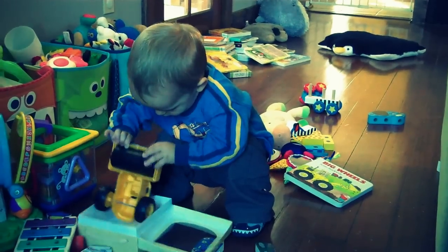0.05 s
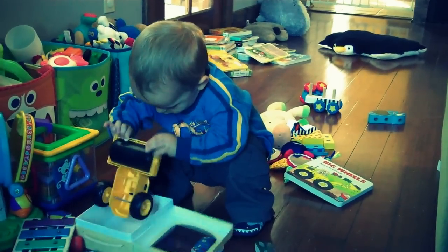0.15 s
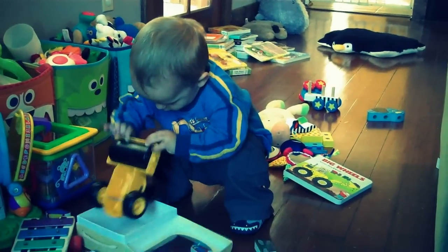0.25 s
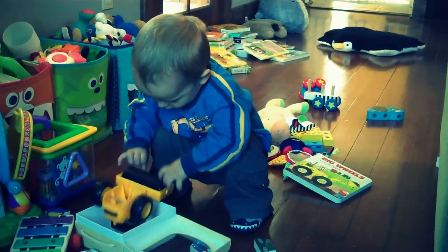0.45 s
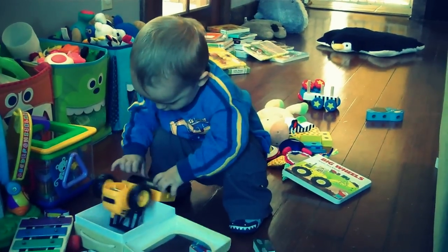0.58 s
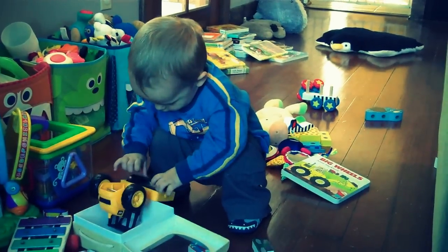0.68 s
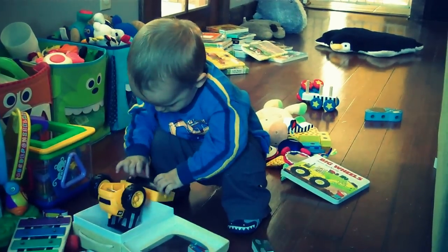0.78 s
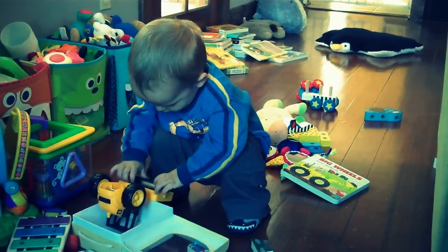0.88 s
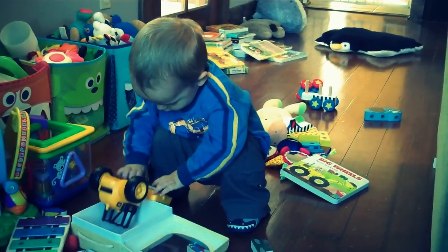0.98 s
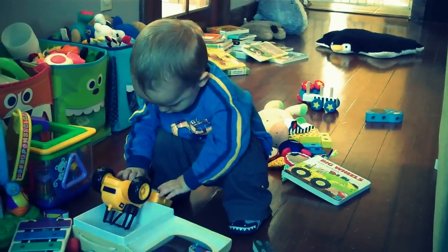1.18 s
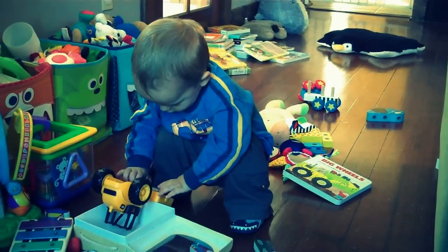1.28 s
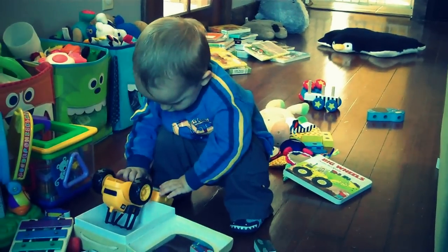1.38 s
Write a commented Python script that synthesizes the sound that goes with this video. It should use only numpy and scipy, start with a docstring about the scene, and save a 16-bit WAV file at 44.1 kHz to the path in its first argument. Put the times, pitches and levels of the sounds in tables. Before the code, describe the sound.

Plastic toy clattering and rattling on a hollow plastic base in a small room.

```python
"""First comes a soft scrape with two light ticks, then a clatter: a plastic toy digger is dragged,
knocked and dropped onto a hollow plastic toy on a wooden floor, then nudged once more.
Each knock is a short crack that sets the digger and the hollow base under it ringing.
Between knocks the wheels scrape and loose parts rattle. A small living room echoes over a faint hiss."""
import sys
import numpy as np
from scipy import signal
from scipy.fft import rfft, irfft
from scipy.io import wavfile

SR = 44100
rng = np.random.default_rng(int(sys.argv[2]) if len(sys.argv) > 2 else 0)


def transcribe(u):
    """Save the signal u as a 16-bit wav file named by the first command-line argument.

    u: samples, shape (n,) or (channels, n), limited to [-1, 1]; the rate is SR.
    q: integer samples, one column per channel.
    """
    v = np.clip(np.atleast_2d(u).T, -1, 1)
    q = np.round(v * 32767).astype(np.int16)
    wavfile.write(sys.argv[1], SR, q)


N = 63945
T = np.arange(N) / SR

# Knocks: t/s, five crack levels/dB (at CRACK_HZ), crack fade/s, digger ring/dB, base ring/dB,
# struck part's f/Hz, its boost/dB. A "fade" is the time a sound takes to drop by 60 dB.
KNOCKS = [ (0.072, -77, -67, -69, -70, -55, 0.055, -81, -74, 6000, 6.3),
          (0.084, -75, -59, -53, -60, -48, .03, -84, -83, 5660, 5.5),
          (0.2099, -71.5, -46.5, -41, -35.5, -36, 0.06, -54, -37, 1250, 3.7),
          (0.2308, -59, -59, -43.5, -34.5, -25, 0.012, -51, -53, 5720, 7),
          (0.278, -62, -40.5, -44.5, -45, -31, 0.052, -58, -62, 6000, 5.3),
          (0.2958, -47, -34, -25.5, -31, -24, 0.058, -35.5, -43.5, 4760, 2.7),
          (0.3089, -46, -55, -32, -30.5, -23.5, 0.06, -60, -53, 1944, 11),
          (0.3729, -59, -66, -27, -35, -55, 0.057, -38.5, -47, 1460, 12),
          (0.4192, -60, -63, -39, -36, -26.5, 0.006, -55, -41, 6050, 1.9),
          (0.4524, -70, -35, -26.5, -35, -29.5, 0.044, -47, -22, 1086, 14),
          (.462, -68, -38, -30.5, -34.5, -57, 0.081, -48, -34, 1980, 13),
          (.481, -48, -44.5, -29.5, -61, -46, 0.1, -60, -41, 1010, 3),
          (0.53, -70, -63, -28.5, -34, -20, 0.0092, -48, -55, 3450, 7.8),
          (.539, -71, -81, -31, -37, -33, 0.011, -59, -57, 1930, 12.5),
          (0.584, -52, -58, -21, -26.5, -7, 0.011, -21.5, -32, 7700, 1.6),
          (.592, -51, -31.5, -29.5, -22, -12.5, 0.038, -25, -25.5, 1220, 6.5),
          (.599, -51, -35, -30, -24.5, -21.5, 0.039, -33.5, -46, 600, 7),
          (0.618, -42, -48, -34, -42, -57, .05, -43, -41, 313, 5),
          (0.6594, -80, -36, -31, -30.5, -20.5, 0.027, -33, -59, 2170, 11.6),
          (.680, -66, -38, -38, -32.5, -26.5, 0.073, -53, -52, 2150, 1.4),
          (.703, -63, -59, -40, -30, -31, 0.068, -46, -57, 3650, 4.9),
          (0.7555, -81, -44.5, -40.5, -34.5, -24, 0.023, -35.5, -36.5, 5840, 6.6),
          (.777, -81, -59, -43, -34, -38, 0.022, -50, -60, 2160, 8.4),
          (.8175, -66, -37, -35, -27, -24.5, 0.048, -52, -31, 695, 16.3),
          (.832, -70, -55, -35.5, -39.5, -22.5, 0.036, -47, -37.5, 710, 17.5),
          (0.8491, -75, -44, -58, -35.5, -34, 0.013, -60, -46.5, 6070, 5.1),
          (0.8793, -62, -51, -56, -34, -28.5, .018, -42.5, -46, 4700, 3.4),
          (1.043, -70, -61, -82, -61, -53, .03, -95, -86, 5400, 4),
          (1.1216, -66, -53.5, -45, -47, -44.5, 0.12, -52, -54, 1500, 11),
          (1.152, -70, -62, -57, -48.5, -49, 0.12, -68, -52, 950, 13),
          (1.173, -66, -62, -63, -60, -41, 0.058, -65, -70, 4150, 3.4),
          (1.182, -72, -70, -66, -45.5, -40, .08, -70.5, -71, 3970, 7.7),
          (1.401, -64, -77, -92, -73, -49.5, 0.11, -84, -82, 6300, 3), ]
# Where the five crack levels apply, bass to treble: f/Hz
CRACK_HZ = [70, 280, 1100, 3000, 6500]
# Tones the digger's shell rings with: f/Hz, level/dB, fade/s
DIGGER_TONES = [(234.4, -4, 0.093), (305.4, -13.5, 0.47), (630, -11, 0.16), (1090.5, 1.5, .07),
                (1190, -5, 0.16), (1300, -11.5, 0.3), (1708, -7, .09), (2150, -4.5, 0.066),
                (4100, -3.5, 0.15), (4140, -20, 0.065), (5880, -4, 0.055), (5470, -14, 0.089),
                (7800, -15, .06), (7770, -20, 0.059)]
# Tones the hollow base rings with: f/Hz, level/dB, fade/s
BASE_TONES = [(178, -13.5, 0.1), (593, -8.5, 0.22), (733, -13, .09), (1013, 0.5, 0.072),
              (1344, -1.5, 0.053), (1521, -1.5, 0.064), (1830, -9, 0.024), (2160, -4, 0.032)]
# How hard the toy scrapes along: t/s, level/dB
SCRAPE_LEVEL = [(0, -52.5), (.07, -52), (.1, -39.5), (.13, -48.5), (.165, -29), (.205, -24.5), (.26, -40),
                (.35, -32), (.43, -32), (.51, -42.5), (.57, -23.5), (.65, -44), (.73, -25.5), (.8, -26.5),
                (.9, -29.5), (.96, -43), (1.03, -57), (1.2, -46), (1.3, -51.5), (1.45, -54.5)]
# The scrape's mix of bass and treble: f/Hz, level/dB
SCRAPE_COLOUR = [(50, -32), (130, -16), (250, -8), (450, -10.5), (700, 5), (1200, 5), (2500, -0.5),
                 (4000, -1), (6000, 0), (8000, 5.5)]
# Hums of the base under a dragging wheel: t/s, length/s, f/Hz, level/dB
WHEEL_HUMS = [(0, 0.084, 706, -59), (0.139, 0.074, 726, -43), (0.148, .075, 601, -47)]
# How long the room echoes: f/Hz, fade/s
ECHO_FADE = [(100, .4), (500, 0.4), (2000, 0.55), (8000, 0.32)]
# The echo against the direct sound: f/Hz, level/dB
ECHO_LEVEL = [(70, -7.5), (250, -6), (1000, -6), (3000, -4.5), (7000, -7)]
# How alike left and right are in echo and hiss: f/Hz, likeness (1 same, -1 opposite)
LIKENESS = [(60, 0.18), (200, 0.88), (700, 0.75), (1500, 0.34), (3000, 0.079), (6000, -0.39)]
# The hiss's mix of bass and treble: f/Hz, level/dB
HISS_COLOUR = [(30, 2), (70, 3.5), (130, 3), (250, 5.5), (450, 5.5), (750, 3), (1500, -2.5), (2500, -5.5),
               (6000, -2), (8000, -3.5)]
# How far the left microphone opening runs ahead of the right: f/Hz, phase/rad
LEFT_LEAD = [(4500, 0), (5700, 0.33), (6900, 1.9), (8000, 0)]
# How much louder the left opening is than the right: f/Hz, level/dB
LEFT_LOUDER = [(200, 0), (4600, -0.3), (5900, -8), (6900, 10.5), (8000, 6)]

BAND_EDGES_HZ = 40 * 2 ** np.arange(0, 8.6, .5)  # half an octave apart
CRACK_RISE_S, BASS_RING_CYCLES = 0.0012, 2.6  # the extra cycles make the bass last longer
SNAP = 0.35  # height of a crack's opening pulse against its burst
SLIPS_PER_S, SLIP_SPREAD_DB = 1300, 2.5
HUM_WIDTH_HZ = 89
ECHO_DELAY_S, ECHO_BUILD_S = 0.0017, 0.002
HISS_DB = -55.5
TREBLE_TOP_HZ, TOP_FIZZ_DB = 7820, -29.5


def cracks():
    """Each knock is a sharp pulse plus a burst of noise: many vibrations that die fast."""
    out, knocks, t = np.zeros(N), np.array(KNOCKS), T[:SR // 8]
    fades = knocks[:, 6:7]
    noise = rng.standard_normal((2, len(knocks), len(t)))
    bursts = 0
    for k, (low, high) in enumerate(zip(BAND_EDGES_HZ, BAND_EDGES_HZ[1:])):
        hz = np.sqrt(low * high)
        rise = 1 - np.exp(-t / CRACK_RISE_S)
        burst = noise[k % 2] * fade_out(t, fades + BASS_RING_CYCLES / hz) * rise
        burst /= np.linalg.norm(burst, axis=1, keepdims=True)
        burst[:, 0] += SNAP * (-1) ** k
        burst = band(burst, low, high)
        burst /= np.linalg.norm(burst, axis=1, keepdims=True)
        gain = from_db([at_hz(list(zip(CRACK_HZ, knock[1:6])), hz) for knock in knocks])
        bursts += burst * gain[:, None] * np.sqrt(SR / 200)  # the energy of 5 ms at this level
    for (s, *_, hz, boost_db), burst in zip(knocks, bursts):
        add(out, struck_part(burst, hz, boost_db), s)
    return out


def struck_part(crack, hz, boost_db):
    """The part that is hit makes the crack louder around its own pitch."""
    near_pitch = signal.lfilter(*signal.iirpeak(hz, Q=16.4, fs=SR), crack)
    return crack + (from_db(boost_db) - 1) * near_pitch


def ringing_shell(tones, strikes, uneven_db):
    """Each strike (t/s, level/dB) rings all the shell's tones, each with a slightly random strength."""
    out, (s, db) = np.zeros(N), np.transpose(strikes)
    for hz, level_db, fade in tones:
        clicks = np.zeros(N)
        clicks[(s * SR).astype(int)] = from_db(db + level_db + uneven_db * rng.standard_normal(len(s)))
        out += ring(clicks, hz, fade) * rng.choice([-1, 1])
    return out


def scraping():
    """Plastic rubs on plastic in many tiny, uneven slips; harder rubbing is louder."""
    sizes = from_db(SLIP_SPREAD_DB * np.minimum(rng.exponential(1, N), 4))
    signs = rng.choice([-1, 1], N)
    slips = sizes * signs * (rng.random(N) < SLIPS_PER_S / SR)
    level_db = np.interp(T, *np.transpose(SCRAPE_LEVEL))
    return colour(slips, SCRAPE_COLOUR) * from_db(level_db)


def wheel_hums():
    """A dragging wheel makes the base hum around one low pitch, swelling and fading."""
    out = np.zeros(N)
    for s, length, hz, db in WHEEL_HUMS:
        noise = band(rng.standard_normal(N), hz - HUM_WIDTH_HZ / 2, hz + HUM_WIDTH_HZ / 2)
        hum = noise[-int(length * SR):]
        swell = signal.windows.tukey(len(hum), .5)
        add(out, from_db(db) * unit_level(hum * swell), s)
    return out


def room_echo(sound):
    """Sound bounces around the room: the echo builds quickly, then each band fades at its own pace."""
    size = SR // 2
    spectrum, f = rfft(stereo_noise(size)), np.fft.rfftfreq(size, 1 / SR)
    t = np.maximum(T[:size] - ECHO_DELAY_S, 0)
    build_up = 1 - np.exp(-t / ECHO_BUILD_S)
    echo = 0
    for low, high in zip(BAND_EDGES_HZ, BAND_EDGES_HZ[1:]):
        hz = np.sqrt(low * high)
        noise = irfft(spectrum * ((f >= low) & (f < high)), size)
        tail = noise * fade_out(t, at_hz(ECHO_FADE, hz)) * build_up
        band_share = np.sqrt(2 * (high - low) / SR / size)
        echo += unit_level(tail) * band_share * from_db(at_hz(ECHO_LEVEL, hz))
    return signal.fftconvolve(sound[None], echo, axes=1)[:, :N]


def hiss():
    """A faint, steady noise lies behind everything."""
    return from_db(HISS_DB) * colour(stereo_noise(N), HISS_COLOUR)


def microphone_openings(sound):
    """The two openings each ring in their own way, shifting the treble's level and timing."""
    f = np.fft.rfftfreq(2 * N, 1 / SR)
    left = from_db(at_hz(LEFT_LOUDER, f) / 2) * np.exp(.5j * at_hz(LEFT_LEAD, f))
    pair = np.array([left, 1 / left])
    pair /= np.sqrt(np.mean(abs(pair) ** 2, axis=0))
    return irfft(rfft(sound, 2 * N) * pair)[:, :N]


def stereo_noise(size):
    """Noise from all around, with left and right most alike in the low notes."""
    alike = np.clip(at_hz(LIKENESS, np.fft.rfftfreq(size, 1 / SR)), -.99, .99)
    mid, side = rfft(rng.standard_normal((2, size)))
    spectrum = np.sqrt(1 + alike) * mid + np.sqrt(1 - alike) * side * [[1], [-1]]
    return irfft(spectrum, size) / np.sqrt(2)


def ring(clicks, hz, fade):
    """Each click starts a fading tone as tall as the click."""
    decay, angle = fade_out(1 / SR, fade), 2 * np.pi * hz / SR
    return signal.lfilter([.5, 0, -.5], [1, -2 * decay * np.cos(angle), decay * decay], clicks + 1e-18)


def colour(x, table):
    """Give a sound the table's mix of bass and treble, at an average level of 1."""
    gain = from_db(at_hz(table, np.fft.rfftfreq(N, 1 / SR)))
    return unit_level(irfft(rfft(x) * gain, N))


def band(x, low, high):
    """Keep the frequencies between low and high."""
    return signal.sosfilt(signal.butter(3, [low, high], "band", fs=SR, output="sos"), x + 1e-18)


def fade_out(t, fade):
    """Drop by 60 dB every `fade` seconds."""
    return np.exp(-np.log(1000) * t / fade)


def at_hz(table, hz):
    """Read between a table's rows, with octaves evenly spaced."""
    f, values = np.transpose(table)
    return np.interp(np.log(np.maximum(hz, 1)), np.log(f), values)


def from_db(db):
    """Turn decibels into a number to multiply by."""
    return 10 ** (np.asarray(db) / 20)


def unit_level(x):
    """Scale to an average (rms) level of 1."""
    return x / np.sqrt(np.mean(x ** 2) + 1e-20)


def add(out, sound, s):
    """Mix a sound in at s seconds."""
    start = int(s * SR)
    out[start:start + len(sound)] += sound[:N - start]


def scene():
    """The two toys, the room's echo and the hiss."""
    knocks = np.array(KNOCKS)
    toys = cracks()
    toys += ringing_shell(DIGGER_TONES, knocks[:, [0, 7]], uneven_db=3.5)
    toys += ringing_shell(BASE_TONES, knocks[:, [0, 8]], uneven_db=3.9)
    toys += scraping() + wheel_hums()
    return toys + room_echo(toys) + hiss()


def record(dry):
    """The treble drops steeply, leaving a faint high fizz on the sharpest clicks; loud peaks clip."""
    heard = microphone_openings(dry)
    dull = signal.sosfilt(signal.butter(20, TREBLE_TOP_HZ, fs=SR, output="sos"), heard)
    clipped = np.clip(dull + from_db(TOP_FIZZ_DB) * heard, -.95, .95)
    top_cut = signal.ellip(10, .1, 70, 10810, fs=SR, output="sos")  # above 10810 Hz
    return signal.sosfilt(top_cut, clipped)


dry = scene()
out = record(dry)
transcribe(out)
```